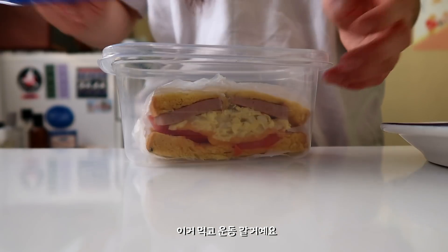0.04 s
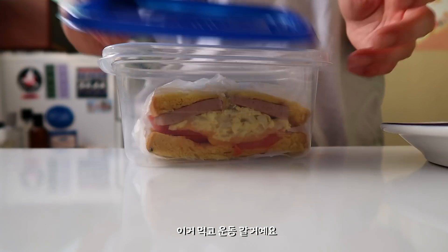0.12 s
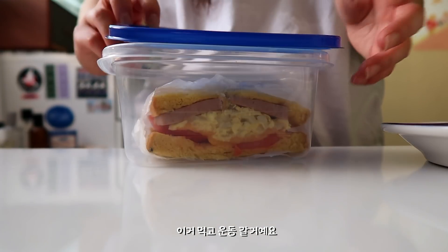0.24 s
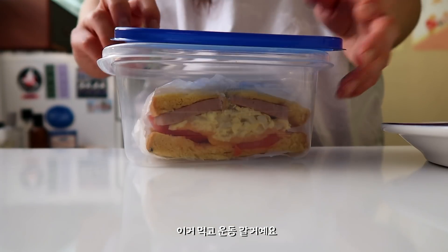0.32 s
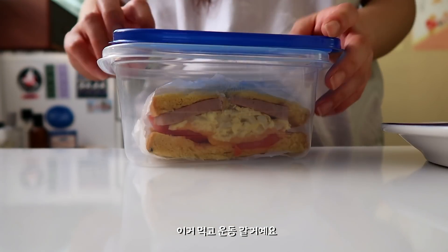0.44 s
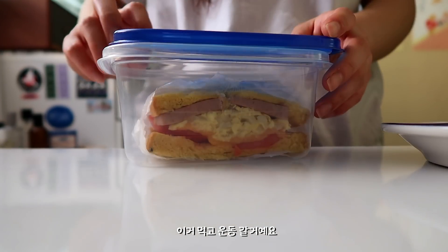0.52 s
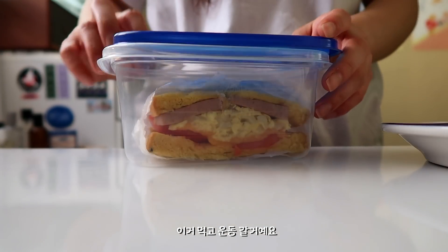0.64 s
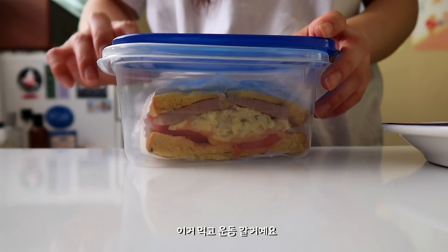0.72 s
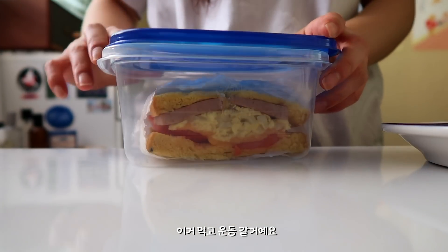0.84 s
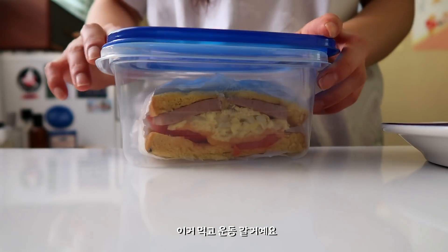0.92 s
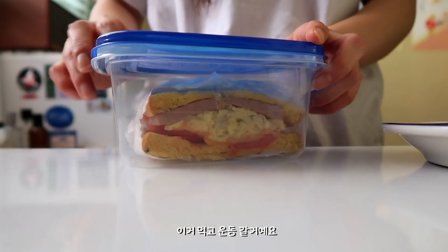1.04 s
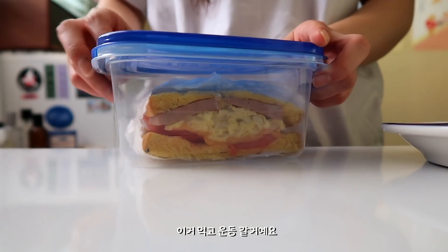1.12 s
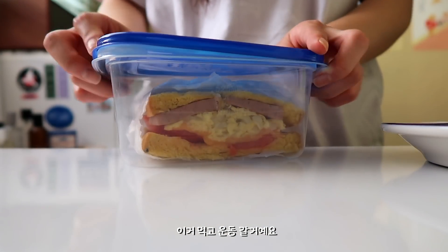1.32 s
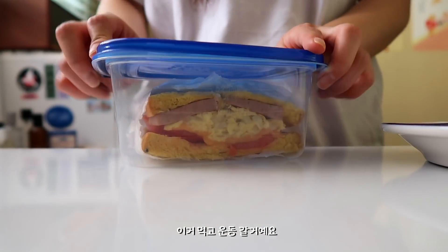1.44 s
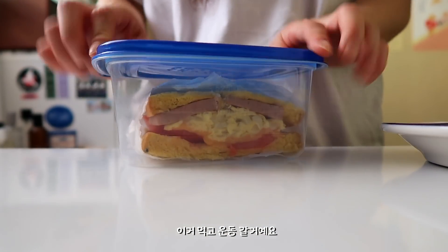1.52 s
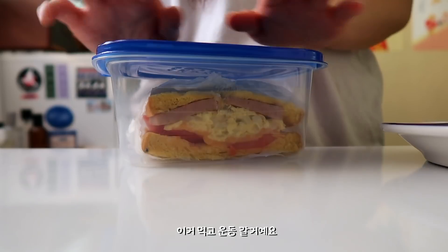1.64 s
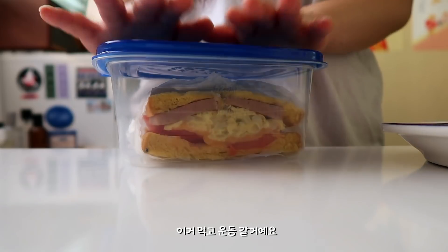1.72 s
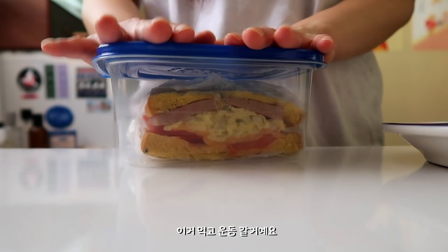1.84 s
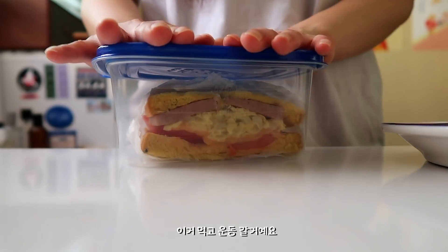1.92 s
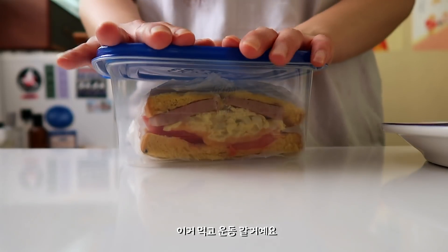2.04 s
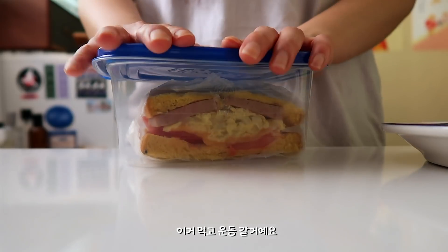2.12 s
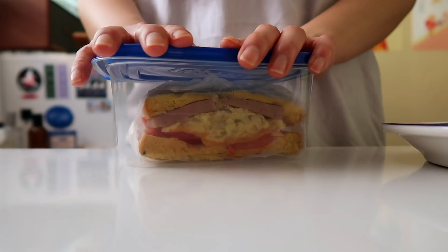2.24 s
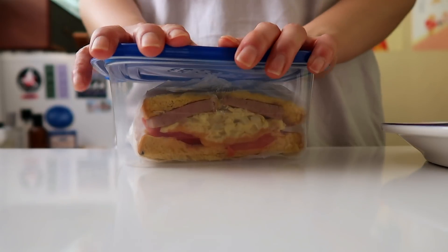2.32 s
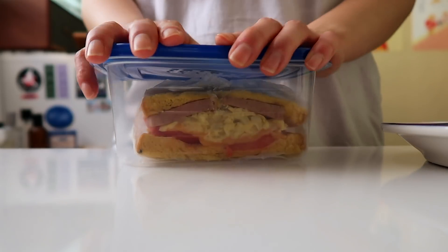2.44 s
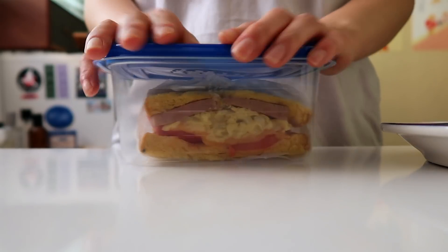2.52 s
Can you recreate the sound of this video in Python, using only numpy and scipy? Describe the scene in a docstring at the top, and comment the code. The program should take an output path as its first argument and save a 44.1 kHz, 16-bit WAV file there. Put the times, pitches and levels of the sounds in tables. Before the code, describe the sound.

A plastic lid is pressed onto a food tub with sharp knocks, clicks and light rubbing.

```python
"""On a counter in a small kitchen, hands press a thin plastic lid onto a food tub, close to a stereo microphone.
Knocks and rim clicks are short noisy pushes that ring decaying modes of tub and lid, each with a thin crack.
Fingers and rim rub in dense random slips that ring the same modes and hiss above them.
A low motor hum of two wandering sines and coloured-noise room air lie underneath."""
import sys
import numpy as np
from scipy import signal
from scipy.fft import rfft, irfft
from scipy.io import wavfile
from scipy.ndimage import uniform_filter1d

SR = 44100
rng = np.random.default_rng(int(sys.argv[2]) if len(sys.argv) > 2 else 0)


def to_wav(sig):
    """Store sig (one row per channel, or 1-D mono) as 16-bit WAV at the path in sys.argv[1].

    Samples outside -1..1 are clipped; the rate is SR.
    """
    pcm = np.clip(np.atleast_2d(sig), -1, 1) * 32767
    pcm = np.round(pcm).astype(np.int16)
    wavfile.write(sys.argv[1], SR, pcm.T)  # frames by channels


N = 112455

# Modes of tub and lid. Each row: frequency in Hz, level in dB, time to fall 60 dB in seconds (before the cap).
TUB_MODES = [(77, -17.5, 0.18), (134, 1, .14), (189, -3, 0.073), (268.6, -3, 0.09), (324.2, -4.5, 0.071),
             (423.6, -3.5, 0.033), (512, -1.5, 0.026), (628.2, -0.5, 0.056), (799, -1, 0.031),
             (881, -3, 0.04), (1180, -5.5, 0.019), (1606, 5, 0.0054), (1825, 5, 0.0074),
             (2252, 5.5, 0.0056), (2980, 1.5, 0.0064), (3334, 3, 0.0041), (4310, -1.5, 0.0042),
             (4736, -3.5, 0.0029), (5420, -21, 0.014)]
RING_CYCLES_MAX = 60  # cap on the 60 dB fall, in cycles

# Knocks of lid on tub. Each row: blow time in seconds before ONSET_DELAY_S, level in dB before KNOCK_GAIN_DB,
# then drive in dB relative to that level at each frequency in Hz of KNOCK_POINTS_HZ.
KNOCKS_ON_TUB = [(0.2015, -6, -42, -28.5, -6, -12.5, -8.5, -15.5, -15.5, -29, -15.5, -18, -14.5, -16.5),
                 (0.798, -21.5, -22, -19, -28, -9, -10.5, -15, -18.5, -23, -16, -19, -25, -20),
                 (1.099, -15.5, -38, -13, -7.5, -4, 2.5, -11, -23, -45, -19, -14.5, -33, -30),
                 (1.103, -13, -37, -17, -14.5, -10.5, -8, -10.5, -27, -10, -18, -12, -25, -32),
                 (1.444, -4.5, -51, -21.5, -25.5, -22, -26, -13, -12.5, -11.5, -11.5, -23.5, -18, -19),
                 (1.844, -26.5, 22, -11.5, -7.5, -5, -16.5, -9.5, -17, -21, -18, -22, -37, -33),
                 (1.911, -14.5, -31, -22, -18, -17.5, -27, -22, -14, -29, -14.5, -16, -17, -20),
                 (2.1505, -13, -30, -21, -24, -20, -41, -6, -21, -15, -26, -14.5, -18.5, -17)]
KNOCK_POINTS_HZ = (78, 132, 190, 265, 420, 635, 840, 1150, 1600, 2270, 3200, 4500)
# Clicks of the rim slipping. Each row: blow time in seconds before ONSET_DELAY_S, level in dB before CLICK_GAIN_DB,
# then drive in dB relative to that level at each frequency in Hz of CLICK_POINTS_HZ.
RIM_CLICKS = [(0.2585, -31, -28, -25, -20, -2, -25), (0.268, -19, -12, -29, -13, -9, -12.5),
              (0.333, -25.5, -11.5, -11.5, -10.5, -11.5, -14), (0.578, -34.5, -2, -10, -8, -10, -22),
              (0.623, -35, -9.5, -20, -14, 2, -50), (0.725, -28, -23, -23, -9, -23, -7),
              (0.742, -34, -4, -26, -25, 3, -33), (0.777, -24, -6.5, -19, -5, -14, -31),
              (0.793, -19.5, -39, -8, -3.5, -13, -32), (0.879, -19.5, -37, -12, -8.5, -8.5, -13.5),
              (0.964, -27.5, -14.5, -6, -17, -10, -34), (1.061, -35.5, -13, -15, -18, -0.5, -9),
              (1.0895, -23, -21, -10, -14, -18, -17), (1.316, -30, -37, -9, -8, -14.5, -40),
              (1.348, -27.5, -15, -10.5, -12.5, -12, -18), (1.39, -26.5, -8, -18, -17, -19, -28),
              (2.112, -31.5, -14, -13.5, -23, -11, -42), (2.128, -32.5, -26, -2, -18, -14, -32),
              (2.176, -20, -25, -12, -22, -11.5, -21.5), (2.199, -17.5, -26, -9, -13, -8.5, -45),
              (2.22, -25, -18.5, -1.5, -13.5, -21, -18), (2.2545, -23, -12, -8.5, -7.5, -14, -28),
              (2.262, -22, -40, -8, -21, -9.5, -20), (2.292, -21.5, -41, -28, -5, -4, -38),
              (2.305, -24, -45, -19, -40, 2.5, -30), (2.397, -45, -33, -24, -22, 0, -30),
              (2.458, -28.5, -5.5, -5, -12, -13, -21), (2.53, -28.5, -8, -4.5, -20, -8, -33)]
CLICK_POINTS_HZ = (250, 630, 900, 2000, 4500)
KNOCK_GAIN_DB, CLICK_GAIN_DB, MODE_SCATTER_DB = 1.5, -3, 1.5
CLATTER_DB, CLATTER_DECAY_S = -3, 0.0028  # decays to 1/e
CRACK_DB, CRACK_DECAY_S, CRACK_HZ = -11, 0.0087, 5940
ONSET_DELAY_S = 0.001165  # fixed delay added to every blow time
THUD_CUT_HZ, CONTACT_HZ = 45, 5180  # band left by the soft contact

# Slowly changing rubbing. Each row: time in seconds, then levels in dB of the upper modes, low modes
# and treble hiss.
RUB_BASE = [(0.0, -67.5, -60.5, -78), (0.48, -63, -54, -74.5), (0.91, -59, -56, -75),
            (1.39, -57, -52, -71.5), (1.56, -61.5, -52, -83), (1.73, -75, -61, -108),
            (2.17, -65, -54.5, -68), (2.36, -55, -56.5, -78), (2.55, -46, -48, -62.5)]
# Short scuffs of rim and fingers. Each row: centre in seconds, length in seconds,
# then levels in dB of the upper modes, low modes and treble hiss.
RUB_SCUFFS = [(0.134, 0.014, -60, -91, -65), (0.252, 0.15, -52, -54, -61.5),
              (0.395, 0.075, -54, -48.5, -69), (0.49, 0.1, -62.5, -54, -64.5), (0.67, 0.1, -54.5, -55, -72),
              (.735, 0.072, -50, -57, -70), (0.787, 0.14, -48.5, -44, -67), (0.875, 0.09, -49.5, -45, -73),
              (1.096, 0.088, -42.5, -44.5, -52), (1.186, 0.15, -56.5, -52, -71),
              (1.25, 0.07, -48, -39, -62.5), (1.456, 0.11, -46.5, -38, -51),
              (1.54, 0.11, -61.5, -56, -70.5), (1.849, 0.1, -52, -47, -66.5),
              (1.908, 0.038, -56, -45.5, -59), (2.307, 0.11, -47, -68, -67.5),
              (2.413, 0.031, -51, -56, -90), (2.54, 0.03, -74, -49, -67)]
SLIPS_PER_S, SLIP_SPREAD_DB = 1800, 3.5
RUB_SPLIT_HZ, HISS_HZ, HISS_WIDTH_HZ = 1250, 4990, 3760

HUM_HZ, HUM_DB, HUM_WANDER = 36.64, -49.5, 0.015  # wander as a share of the pitch
# Octave of the hum. Each row: time in seconds, rms level in dB.
HUM_OCTAVE_LEVEL = [(0.0, -70), (0.3, -49.5), (1.08, -51), (2.05, -45), (2.28, -51.5), (2.55, -77)]

# Colour of room air and microphone hiss. Each row: frequency in Hz, relative level in dB.
AIR_COLOUR = [(15, -62), (25, -10.5), (82, -1), (173, -13.5), (368, -21), (421, -15.5), (722, -35.5),
              (826, -27.5), (1530, -33.5), (6550, -44.5), (13200, -57.5), (15500, -72)]
AIR_DB = -48.5  # rms of the mid
# Stereo width of the air. Each row: frequency in Hz, side minus mid in dB.
AIR_WIDTH = [(60, -68), (110, -27), (200, -7.5), (380, -5.5), (700, 1.5), (1290, 0.5), (2380, 2), (4400, 2),
             (8120, 0.5), (15000, 2)]
# Stereo width of the nearby tub. Each row: frequency in Hz, side minus mid in dB.
TUB_WIDTH = [(60, -50), (110, -51), (200, -33), (380, -23.5), (700, -29), (1290, -27), (2380, -19.5),
             (4400, -5.5), (8120, 2.5), (15000, 10)]
ROOM_DB, ROOM_T60_S, ROOM_HZ = -18.5, 0.14, 1520
TOP_HZ = 15600


def undb(db):
    """dB to gain."""
    return 10 ** (np.asarray(db) / 20)


def unit(x):
    """Scale to rms 1."""
    return x / np.sqrt(np.mean(x ** 2))


def curve(table, col):
    """Gain over time from a dB column, straight in dB between rows."""
    rows = np.array(table)
    return undb(np.interp(np.arange(N) / SR, rows[:, 0], rows[:, col]))


def colour(x, table):
    """Filter by points of Hz and dB, straight over log frequency."""
    rows, hz = np.array(table), np.fft.rfftfreq(N, 1 / SR)
    gain_db = np.interp(np.log(hz + 1), np.log(rows[:, 0]), rows[:, 1])
    return irfft(rfft(x) * undb(gain_db), N)


def ring(x, hz, t60):
    """One decaying mode; a unit impulse rings with starting amplitude 1."""
    t60 = min(t60, RING_CYCLES_MAX / hz)
    pole = np.exp(2j * np.pi * hz / SR - np.log(1000) / (t60 * SR))
    return signal.lfilter([1], [1, -pole], x).imag


def band(x, hz, width_hz):
    """Wide resonance."""
    return signal.lfilter(*signal.iirpeak(hz, hz / width_hz, SR), x)


def walk(rate):
    """Smoothed random drift of rms 1, from `rate` fresh values per second."""
    k = int(SR / rate)
    steps = np.repeat(rng.standard_normal(N // k + 1), k)
    return unit(uniform_filter1d(uniform_filter1d(steps, k), k)[:N])


def hum():
    """A low motor hum: a sine of wandering pitch and level, with an octave that swells and fades."""
    phase = 2 * np.pi * np.cumsum(HUM_HZ * (1 + HUM_WANDER * walk(3.66))) / SR
    fundamental = undb(HUM_DB + 1.0 * walk(3.3)) * np.sin(phase)
    octave = curve(HUM_OCTAVE_LEVEL, 1) * np.sin(2 * phase + 1)
    return np.sqrt(2) * (fundamental + octave)


def air():
    """Room air and microphone hiss: independent coloured noises for mid and side."""
    mid, side = (colour(rng.standard_normal(N), AIR_COLOUR) for _ in range(2))
    gain = undb(AIR_DB) / np.std(mid)
    return gain * mid, gain * colour(side, AIR_WIDTH)


def pressure(base_col):
    """Gain of one rubbing part: the slowly changing level plus swelling scuffs."""
    t = np.arange(N) / SR
    gain = curve(RUB_BASE, base_col)
    for row in RUB_SCUFFS:
        centre_s, length_s = row[:2]
        swell = np.cos(np.pi * np.clip((t - centre_s) / length_s, -.5, .5)) ** 2
        gain = gain + undb(row[base_col + 1]) * swell
    return gain


def slips():
    """Stick-slip contact: sparse impulses at random times, of uneven size and either sign."""
    happens = rng.random(N) < SLIPS_PER_S / SR
    size = undb(SLIP_SPREAD_DB * np.minimum(rng.exponential(size=N), 4))
    return happens * size * rng.choice([-1, 1], N)


def rung_part(x, modes):
    """Slips ring a group of modes with alternating signs, scaled to rms 1."""
    return unit(sum((-1) ** k * undb(db) * ring(x, hz, t60) for k, (hz, db, t60) in enumerate(modes)))


def rubbing():
    """Dense uneven slips ring the modes; skin on plastic hisses above."""
    gripped = slips() * undb(4.1 * walk(80))
    # the two lowest modes stay out of the rubbing
    low = rung_part(gripped, [m for m in TUB_MODES[2:] if m[0] < RUB_SPLIT_HZ])
    upper = rung_part(gripped, [m for m in TUB_MODES if m[0] >= RUB_SPLIT_HZ])
    hiss = band(gripped + slips(), HISS_HZ, HISS_WIDTH_HZ)
    hiss = unit(band(hiss, HISS_HZ, HISS_WIDTH_HZ))
    return upper * pressure(1) + low * pressure(2) + hiss * pressure(3)


def blows(table, table_hz, gain_db):
    """A push with a short clatter drives every mode with random sign; a thin noise crack joins it."""
    size = 512
    t = np.arange(size) / SR
    drive, crack = np.zeros((len(TUB_MODES), N + size)), np.zeros(N + size)
    mode_hz = np.log(np.array(TUB_MODES)[:, 0])
    for blow_s, level_db, *rel_db in table:
        i = int((blow_s + ONSET_DELAY_S) * SR)
        clatter, hiss = rng.standard_normal((2, size))
        # the clatter has about unit energy before its level
        clatter = clatter * np.exp(-t / CLATTER_DECAY_S) / np.sqrt(CLATTER_DECAY_S * SR / 2)
        push = undb(CLATTER_DB) * clatter
        push[0] += 1
        blow_db = level_db + gain_db
        mode_db = blow_db + np.interp(mode_hz, np.log(table_hz), rel_db)
        mode_db = mode_db + MODE_SCATTER_DB * rng.standard_normal(len(mode_hz))
        swing = undb(mode_db) * rng.choice([-1, 1], len(mode_hz))
        drive[:, i:i + size] += swing[:, None] * push
        crack[i:i + size] += undb(blow_db + rel_db[-1] + CRACK_DB) * hiss * np.exp(-t / CRACK_DECAY_S)
    return drive[:, :N], band(crack[:N], CRACK_HZ, CRACK_HZ)


def tub():
    """Knocks and clicks ring the modes, dulled by soft plastic contact; rubbing is added."""
    knock_drive, knock_crack = blows(KNOCKS_ON_TUB, KNOCK_POINTS_HZ, KNOCK_GAIN_DB)
    click_drive, click_crack = blows(RIM_CLICKS, CLICK_POINTS_HZ, CLICK_GAIN_DB)
    click_drive[0] = 0  # clicks leave the lowest mode still
    drive = knock_drive + click_drive
    hits = sum(undb(db) * ring(x, hz, t60) for x, (hz, db, t60) in zip(drive, TUB_MODES))
    hits = hits + knock_crack + click_crack
    contact = signal.butter(2, [THUD_CUT_HZ, CONTACT_HZ], "bandpass", fs=SR)
    return signal.lfilter(*contact, hits) + rubbing()


def room(dry):
    """Small-kitchen reverberation: a dulled, decaying noise tail starting after 4 ms."""
    t = np.arange(SR // 3) / SR
    tail = signal.lfilter(*signal.butter(1, ROOM_HZ, fs=SR), rng.standard_normal(len(t)))
    tail = tail * undb(-60 * t / ROOM_T60_S) * (t > .004)
    return undb(ROOM_DB) * signal.fftconvolve(dry, tail / np.linalg.norm(tail))[:N]


def tub_side(near):
    """Stereo side of the tub: smeared by a short noise burst and weighted to the treble."""
    smear = rng.standard_normal(1000) * np.exp(-np.arange(1000) / 220.0)
    return colour(signal.fftconvolve(near, smear / np.linalg.norm(smear))[:N], TUB_WIDTH)


def scene():
    """The tub close by in a small kitchen, over hum and air; left is mid plus side, right is mid minus side."""
    close = tub()
    near = close + room(close)
    side = tub_side(near)
    mid_air, side_air = air()
    mid = near + hum() + mid_air
    side = side + side_air
    return np.array([mid + side, mid - side])


def record(dry):
    """The recorder cuts the top with a steep low-pass."""
    return signal.sosfilt(signal.ellip(8, .2, 70, TOP_HZ, fs=SR, output="sos"), dry)


dry = scene()
out = record(dry)
to_wav(out)
```